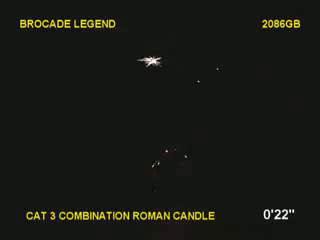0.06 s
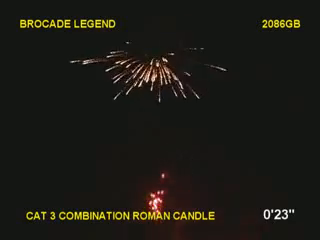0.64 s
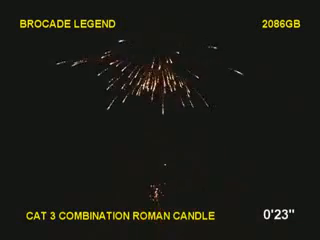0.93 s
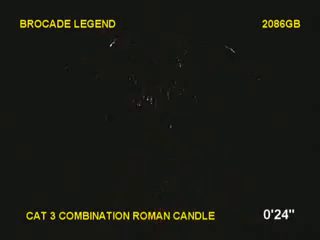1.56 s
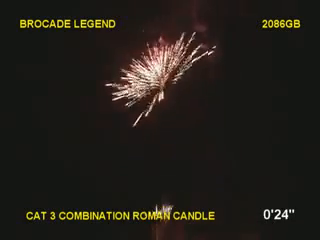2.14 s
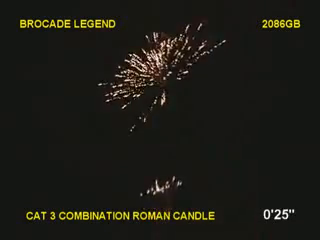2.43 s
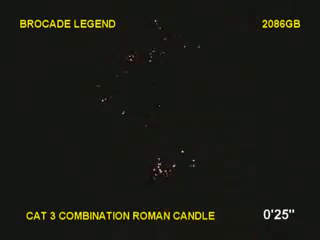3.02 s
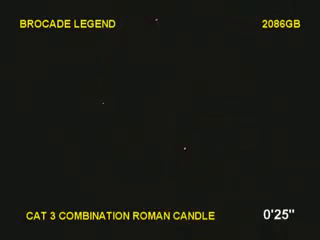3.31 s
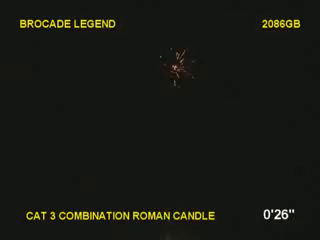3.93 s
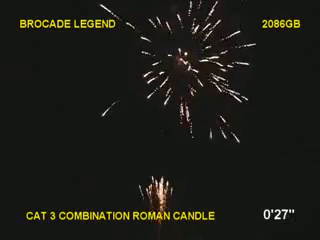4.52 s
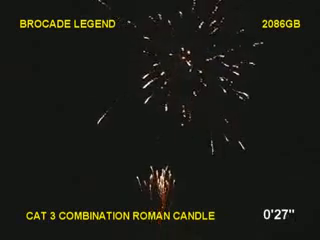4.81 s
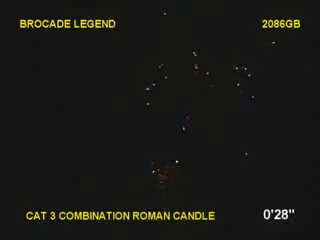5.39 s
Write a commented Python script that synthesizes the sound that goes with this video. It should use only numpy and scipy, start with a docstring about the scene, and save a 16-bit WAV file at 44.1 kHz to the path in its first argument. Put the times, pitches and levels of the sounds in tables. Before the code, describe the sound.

In an open field at night, a firework goes off three times at a steady pace. Every shot is a quick double hit: a launch thud, then a hard, slightly distorted bang in the air. Short echoes bounce off walls and a longer wash fades among trees. A thin, barely audible whistle trails the first bang. Between shots, the single microphone picks up only soft pops of burning pellets and a low rumble of air.

```python
"""Faint pops over a low night rumble, then a roman candle fires three loud shots in a field.
Each shot is a thump from the tube, then the crack of the shell bursting overhead. The blasts overload
the microphone, slap back from buildings and roll away through the trees. A shred of casing whistles
after the first shot, and burning stars (the glowing pellets) pop faintly in between."""
import sys
import numpy as np
from scipy import signal
from scipy.fft import rfft, irfft, next_fast_len
from scipy.io import wavfile
from scipy.ndimage import map_coordinates

SR = 44100
rng = np.random.default_rng(int(sys.argv[2]) if len(sys.argv) > 2 else 0)


def waveform_to_disk(signal):
    """Save audio, clipped to [-1, 1], as 16-bit WAV at the path in sys.argv[1]."""
    frames = np.transpose(np.atleast_2d(signal))
    scaled = np.clip(frames, -1, 1) * 32767
    samples = np.round(scaled).astype(np.int16)
    wavfile.write(sys.argv[1], SR, samples)


N = 249606

# Shells bursting: start_s, level_db, push_ms, bass_cut_hz, tear_db, ring_hz, ring_db,
# then their echo in the trees: roll_db, roll_bass_db, roll_length_factor, leaves_db
SHELL_BURSTS = [(0.7035, 8, 0.83, 40, -7, 586, -11, -26, -2, 0.98, -10),
                (2.3898, 11.5, 0.53, 55, -10.5, 632.5, -10.5, -24.5, -0.5, 1, -14),
                (4.5133, 9.5, 1.83, 200, -7, 544, -20, -24, 0.5, 1.004, -15)]
# Launch charges (two in the first shot): start_s, level_db, push_ms, clatter_db, tube_db, hiss_db
LAUNCHES = [(0.5825, -10.5, 4.6, -16, -40.5, -26.5), (0.6103, 10.5, 1.3, -32.5, -24, -29),
            (2.2938, 7.5, 1.08, -24.5, -18, -30.5), (4.419, 9.5, 1.05, -21.5, -13.5, -26.5)]
# The tube's own notes: pitch_hz, level_db
TUBE_NOTES = [(385, 3.5), (625, 0), (850, -4)]
# Small, hard cracks: start_s, level_db, ring_hz, fade_s (every fade_s is the time to fall by 60 dB)
SMALL_CRACKS = [(0.6903, -5, 2360, 0.012), (0.841, -29, 2300, 0.012), (2.4987, -11, 2300, 0.012),
                (2.662, -23, 2290, 0.014), (4.5295, -8, 2460, 0.0077)]
# Echoes from buildings: start_s, level_db, push_ms, treble_cut_hz, ring_db
WALL_ECHOES = [(0.7563, -27, .6, 1500, 4), (0.7797, -15.5, 1.3, 5960, -17), (0.7964, -23.5, 1.2, 2500, -2),
               (.852, -19, 1.5, 5000, -11), (.86, -14, 2.3, 2000, -16), (0.928, -25.5, 1, 1500, 1.5),
               (2.4445, -15.5, .6, 700.5, -1), (2.483, -13.5, 0.9, 2500, -4),
               (2.4984, -10.5, 1.8, 6000, -21), (2.5487, -11.5, 1.4, 900, -13),
               (2.589, -16, 1.7, 5000, -10), (4.566, -13.5, 0.66, 700, -3.5), (4.603, -15.5, .8, 2500, 2),
               (4.672, -5.5, 0.99, 700, -15), (4.688, -13, 0.77, 700, -8.5), (4.7387, -18.5, 1.1, 700, -5)]
# How long each pitch lasts among the trees: pitch_hz, fade_s
TREE_FADES = [(60, 1.84), (250, 2.72), (1000, 2.43), (2500, 2.027), (4500, 1.56), (8000, 0.87)]
# The clearest pops of burning stars: start_s, level_db
STAR_POPS = [(0.207, -44), (.303, -39), (2.056, -43), (3.552, -38.5), (4.02, -42), (4.118, -38.5),
             (4.198, -44), (4.291, -43), (4.314, -42), (5.028, -31)]
# Pitches at which the camera body rings: pitch_hz, width_hz, boost_db
BODY_RESONANCES = [(240, 180, 2.5), (621, 35, 2), (1770, 140, 0), (2430, 260, 2.5), (3540, 490, 1.5)]

# The tone of each noise, from bass to treble: pitch_hz, level_db
TEAR_TONE = [(40, -11.5), (120, 0.5), (260, -3.5), (430, -2), (660, 0), (1100, -14.5), (1500, -6.5),
             (2400, -11), (3300, -20.5), (5500, -26.5), (8000, -40)]  # a shell's case tearing
CLATTER_TONE = [(60, -20.5), (250, 11), (600, 4.5), (1100, -10), (3000, -29.5), (8000, -53.5)]  # the ground around the tube
DULL_ECHO_TONE = [(60, -27.5), (200, -2), (330, 2), (520, -6), (800, -17.5), (1500, -21), (3000, -25.5),
                  (8000, -36.5)]  # the hollow echo of a launch
HISS_TONE = [(500, -19.5), (2500, 10), (7500, 1.5), (9000, -43)]  # a brief bright hiss with each launch thump
TREE_TONE = [(24, -31), (40, -13.5), (122, -0.5), (194, -6), (254, -5.5), (332, -7), (708, -9),
             (945, -12.5), (1080, -11.5), (1800, -11.5), (2360, -12.5), (3930, -16.5), (5200, -27.5),
             (6560, -29), (7670, -34.5), (8200, -77.5), (10700, -91.5), (18000, -120)]  # echoes from trunks and branches
LEAF_TONE = [(800, -27), (2500, 7), (4200, 18), (5000, 5.5), (6200, -19), (8000, -41)]  # echoes from the nearest leaves
POP_TONE = [(60, 5), (250, 15.5), (1200, 5), (2600, -6), (4000, -16.5), (8000, -56)]  # a burning star
NIGHT_TONE = [(12, -27), (20, -0.5), (55, 2), (160, -14.5), (376, -19.5), (575, -18), (703, -25.5),
              (758, -21), (1780, -25.5), (2020, -28), (3770, -37.5), (4970, -58.5), (7060, -69.5),
              (8000, -74), (10400, -99), (17600, -120)]  # the open air


def shell_bursts(ground_delay_s=0.0036, ground_db=1.0):
    """A shell's shock arrives directly and off the ground, with a hollow ring and its case tearing."""
    out, t = np.zeros(N), np.arange(SR // 4) / SR
    rise = 1 - np.exp(-t / 0.002)
    for start_s, level_db, push_ms, bass_cut_hz, tear_db, ring_hz, ring_db, *_ in SHELL_BURSTS:
        shock = amp(level_db) * blast(t, push_ms, bass_cut_hz, treble_cut_hz=7000)
        nearby_scatter = fade(t, -40, fade_s=0.3)
        tear = (fade(t, tear_db, fade_s=0.034) + nearby_scatter) * noise(TEAR_TONE, len(t))
        ring = fade(t, ring_db, fade_s=0.041) * -np.cos(2 * np.pi * ring_hz * t)
        add(out, start_s, shock + amp(level_db) * rise * (tear + ring))
        add(out, start_s + ground_delay_s, amp(ground_db) * shock)
    return out


def launches(clatter_peak_s=0.0044, clatter_width_s=0.005):
    """Each charge thumps and rings the tube, with a brief hiss; the ground adds clatter and an echo."""
    out, t = np.zeros(N), np.arange(SR // 2) / SR
    rise = 1 - np.exp(-t / 0.0023)
    notes = sum(amp(db) * -np.cos(2 * np.pi * hz * t) for hz, db in TUBE_NOTES)
    clatter_shape = np.exp(-np.abs(t - clatter_peak_s) / clatter_width_s)
    for start_s, level_db, push_ms, clatter_db, tube_db, hiss_db in LAUNCHES:
        shock = blast(t, push_ms, bass_cut_hz=182, treble_cut_hz=8000)
        clatter = amp(clatter_db) * clatter_shape * noise(CLATTER_TONE, len(t))
        echo = fade(t, -43, fade_s=0.59) * noise(DULL_ECHO_TONE, len(t))
        tube = fade(t, tube_db, fade_s=0.017) * notes
        hiss = fade(t, hiss_db, fade_s=0.04) * noise(HISS_TONE, len(t))
        add(out, start_s, amp(level_db) * (shock + rise * (clatter + tube + echo)) + hiss)
    return out


def small_cracks(ring_db=-2, spray_db=-14):
    """Tiny charges go off with a very short shock, a bright ring and a spray of noise."""
    out, t = np.zeros(N), np.arange(SR // 8) / SR
    shock = blast(t, push_ms=0.067, bass_cut_hz=197, treble_cut_hz=3000)
    for start_s, level_db, ring_hz, fade_s in SMALL_CRACKS:
        smear = 0.54 * wobble(900, len(t))
        ring = fade(t, ring_db, fade_s) * -np.sin(2 * np.pi * ring_hz * t + smear)
        spray = fade(t, spray_db, fade_s=0.045) * noise(TREE_TONE, len(t))
        add(out, start_s, amp(level_db) * (shock + ring + spray))
    return out


def wall_echoes(ring_hz=390):
    """Walls throw the blasts back as separate thuds, dulled on the way and smeared into a hollow ring."""
    out, t = np.zeros(N), np.arange(SR // 8) / SR
    for start_s, level_db, push_ms, treble_cut_hz, ring_db in WALL_ECHOES:
        thud = blast(t, push_ms, bass_cut_hz=131, treble_cut_hz=treble_cut_hz)
        smear = 0.91 * wobble(300, len(t))
        ring = fade(t, ring_db, fade_s=0.021) * -np.sin(2 * np.pi * ring_hz * t + smear)
        add(out, start_s, amp(level_db) * (thud + ring))
    return out


def tree_echoes(edge_s=0.078, edge_width_s=0.0087, boom_hz=600, leaves_s=0.096, leaves_width_s=0.03):
    """Countless echoes from trunks and branches swell at the wood's edge, then die away, treble first."""
    out, t = np.zeros(N), np.arange(5 * SR // 2) / SR
    in_wood = (1 + np.tanh((t - edge_s) / edge_width_s)) / 2
    swell_db = -6 * (1 - in_wood) + 2 * np.exp(-t / 0.037)
    shape = amp(swell_db) * (1 - np.exp(-t / 0.0014))
    bass_share = lambda hz: 1 / (1 + (hz / boom_hz) ** 4)
    for start_s, *_, roll_db, bass_db, length_factor, leaves_db in SHELL_BURSTS:
        # Twigs return an even wash of treble; large surfaces return the bass in clumps.
        wash = roughen(rng.standard_normal(len(t)), depth_db=0.94, per_s=400)
        wash = filtered(wash, lambda hz: np.sqrt(1 - bass_share(hz)))
        booms = amp(bass_db) * roughen(rng.standard_normal(len(t)), depth_db=2.5, per_s=89.73)
        booms = filtered(booms, lambda hz: np.sqrt(bass_share(hz)))
        echoes = with_tone(wash + booms, TREE_TONE)
        # Split the echoes into pitch bands so that each can fade at its own speed.
        band_hz, age_s, bands = signal.stft(echoes, SR, nperseg=512)
        fade_s = length_factor * look_up(TREE_FADES, band_hz)[:, None]
        tail = signal.istft(bands * fade(age_s, 0, fade_s), SR)[1][:len(t)]
        # The nearest leaves answer with a bright, sizzling splash.
        sizzle = roughen(noise(LEAF_TONE, len(t)), depth_db=3, per_s=500)
        splash = amp(leaves_db) * np.exp(-((t - leaves_s) / leaves_width_s) ** 2) * sizzle
        add(out, start_s, amp(roll_db) * (shape * tail + splash))
    return out


def shred_whistle(peak_s=1.165, peak_hz=2478, peak_db=-47.5, fall_hz_per_s=330):
    """A flying shred of casing whistles faintly: it swells, drops in pitch as it slows and dies fast."""
    t = np.arange(N) / SR - peak_s
    pitch_hz = peak_hz - fall_hz_per_s * t + 11 * wobble(120, N)
    swell_db = np.minimum(38 * t, -400 * t)  # slowly up to the peak, quickly down after it
    level_db = peak_db + swell_db + 2 * wobble(50, N)
    after_first_burst = np.arange(N) / SR > SHELL_BURSTS[0][0]
    return after_first_burst * amp(level_db) * np.sqrt(2) * np.sin(2 * np.pi * np.cumsum(pitch_hz) / SR)


def star_pops(faint_per_s=1.3, air_cut_hz=3200):
    """Burning stars pop, each with a short echo and dulled by the air; fainter ones come at random."""
    out, t = np.zeros(N), np.arange(SR // 4) / SR
    shape = fade(t, -2, fade_s=0.027) + fade(t, -19, fade_s=0.21)  # the pop and its echo
    chance = rng.random(size=(40, 2))
    faint_start_s = np.cumsum(-np.log(chance[:, 0])) / faint_per_s
    faint_db = -49 - chance[:, 1]
    for start_s, level_db in STAR_POPS + list(zip(faint_start_s, faint_db)):
        add(out, start_s, amp(level_db) * shape * noise(POP_TONE, len(t)))
    return signal.sosfilt(signal.butter(6, air_cut_hz, fs=SR, output="sos"), out)


def night_air(level_db=-49.0, drift_db=2.5):
    """The open air rumbles softly, its level drifting up and down."""
    return amp(level_db + drift_db * wobble(4.826, N)) * noise(NIGHT_TONE, N)


def blast(t, push_ms, bass_cut_hz, treble_cut_hz):
    """A sudden push of air, then suction; a small microphone flips the wave and thins its bass."""
    progress = t * 1000 / push_ms  # the push turns to suction at 1
    pressure = (progress - 1) * np.exp(-progress)
    thinned = signal.lfilter(*signal.butter(2, bass_cut_hz, "high", fs=SR), pressure)
    return signal.lfilter(*signal.butter(1, treble_cut_hz, fs=SR), thinned)


def amp(db):
    """Turn decibels into a number to multiply a sound by."""
    return 10 ** (np.asarray(db) / 20)


def fade(t, start_db, fade_s):
    """A level that begins at start_db and falls by 60 dB every fade_s seconds."""
    return amp(start_db - 60 * t / fade_s)


def unit(sound):
    """Scale a sound so that its average (rms) level is 1."""
    return sound / np.sqrt(np.mean(sound ** 2) + 1e-20)


def look_up(table, hz):
    """Read between the rows of a table of pitches and values, on a log pitch scale."""
    pitches, values = np.transpose(table)
    return np.interp(np.log(hz + 1), np.log(pitches + 1), values)


def filtered(sound, gain_at):
    """Turn each frequency in a sound up or down by gain_at(hz)."""
    size = next_fast_len(len(sound) + 8192)
    return irfft(rfft(sound, size) * gain_at(np.fft.rfftfreq(size, 1 / SR)), size)[:len(sound)]


def with_tone(sound, tone):
    """Shape a sound with a tone table and bring it to level 1."""
    return unit(filtered(sound, lambda hz: amp(look_up(tone, hz))))


def noise(tone, size):
    """Random noise with the given tone, at level 1."""
    return with_tone(rng.standard_normal(size), tone)


def wobble(per_s, size):
    """A smooth curve through per_s random points a second."""
    return map_coordinates(rng.standard_normal(4096), [np.arange(size) * per_s / SR], mode="wrap")


def roughen(sound, depth_db, per_s):
    """Make a sound flicker at random and bring it to level 1."""
    return unit(sound * amp(depth_db * wobble(per_s, len(sound))))


def add(track, start_s, sound):
    """Mix a sound into the track at start_s."""
    part = track[round(start_s * SR):][:len(sound)]
    part += sound[:len(part)]


def scene():
    """Everything that reaches the one microphone."""
    shots = launches() + shell_bursts() + small_cracks()
    echoes = wall_echoes() + tree_echoes()
    return (shots + echoes + shred_whistle() + star_pops() + night_air())[None]


def record(dry, ceiling=0.3, hardness=10, top_hz=7950):
    """The microphone flattens loud peaks, the camera body colours the sound and high treble is cut."""
    clipped = dry[0] / (1 + np.abs(dry[0] / ceiling) ** hardness) ** (1 / hardness)

    def body_gain(hz):
        """The camera body boosts the frequencies near those at which it rings."""
        return 1 + sum((amp(db) - 1) * 1j * hz * width / (pitch ** 2 - hz ** 2 + 1j * hz * width)
                       for pitch, width, db in BODY_RESONANCES)

    coloured = filtered(clipped, body_gain)
    return filtered(coloured, lambda hz: 1 / np.sqrt(1 + (hz / top_hz) ** 80))[None]


dry = scene()
out = record(dry)
waveform_to_disk(out)
```